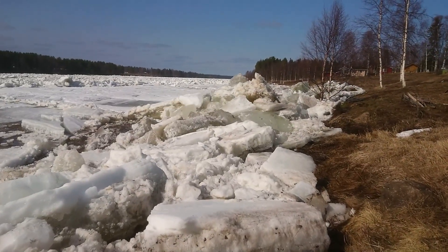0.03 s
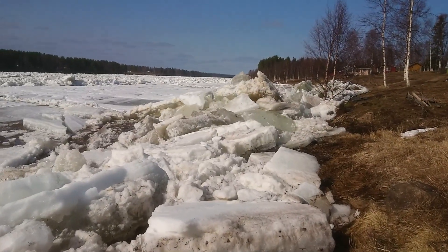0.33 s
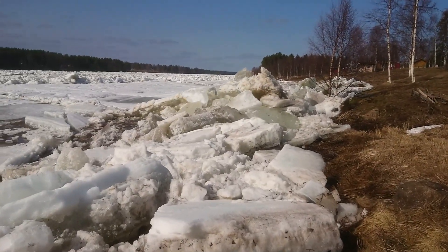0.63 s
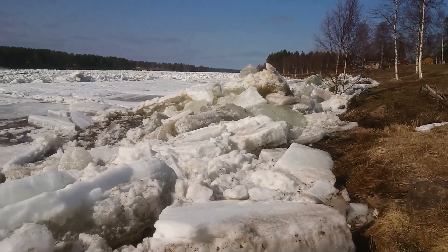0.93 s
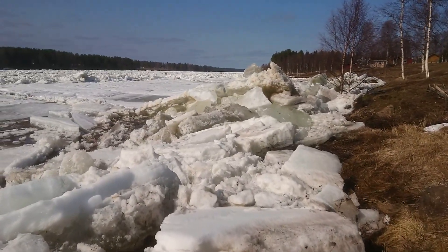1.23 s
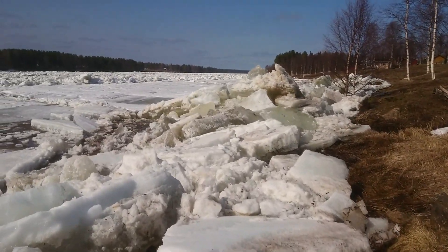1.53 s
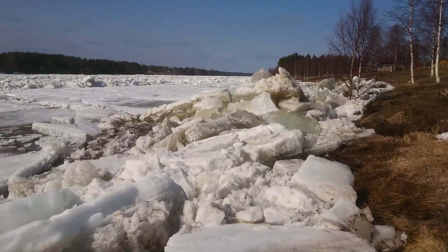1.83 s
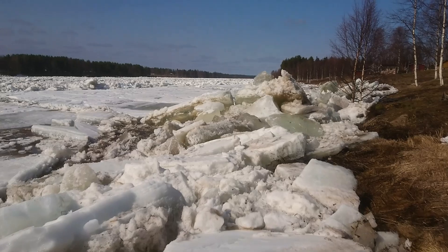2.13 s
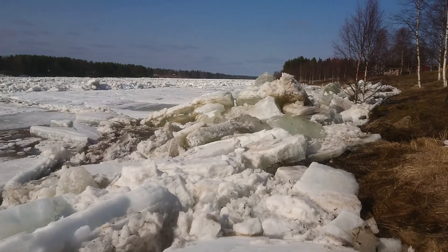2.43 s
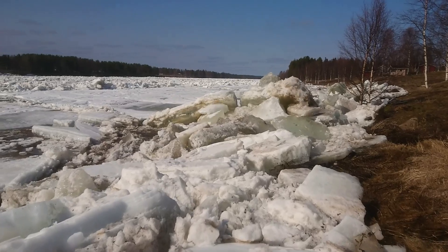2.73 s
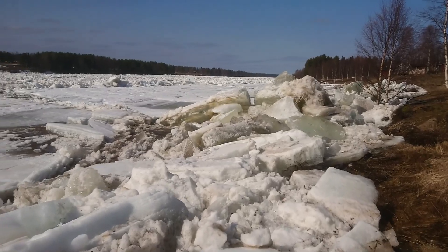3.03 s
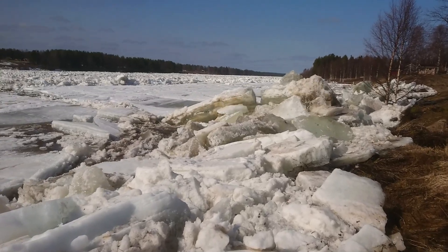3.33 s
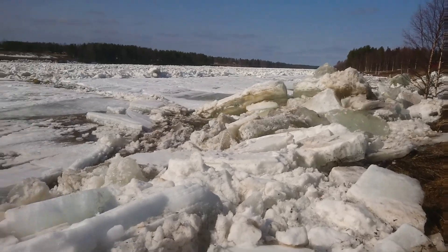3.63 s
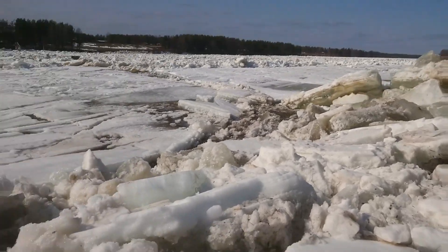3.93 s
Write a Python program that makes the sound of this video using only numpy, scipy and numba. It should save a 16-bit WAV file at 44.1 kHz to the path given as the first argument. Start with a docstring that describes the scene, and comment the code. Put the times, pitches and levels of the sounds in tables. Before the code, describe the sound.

Broken river ice crumbles and clinks over washing water, with wind buffeting the microphone.

```python
"""Wind buffets a two-port microphone, mostly on the right, over washing water and a faint tinkle of ice.
It is spring break-up, the river lying to the left: drifting floes push into a pile of rotten ice,
which crumbles in two surges of countless clinking shards. A narrow hiss swells briefly right, later left.
A few pieces crack, two heavy blocks settle, and the pile grinds as it gives way in the second surge."""
import sys
import numpy as np
from scipy import signal
from scipy.fft import rfft, irfft
from scipy.io import wavfile
from numba import njit

SR = 44100
rng = np.random.default_rng(int(sys.argv[2]) if len(sys.argv) > 2 else 0)


def persist_wave(psi):
    """Save psi, clipped to +-1, as 16-bit WAV."""
    counts = np.round(np.clip(psi, -1, 1) * 32767).astype(np.int16)
    wavfile.write(sys.argv[1], SR, np.atleast_2d(counts).T)


N = 176400
TIMES = np.arange(N) / SR
FREQS = np.maximum(np.arange(N // 2 + 1) * SR / N, 1)
LOW_CUT_HZ, TOP_HZ = 31.5, 15850


def undb(db):
    """Decibels to gain."""
    return 10 ** (np.asarray(db) / 20)


def unit(x):
    """Normalise to rms 1."""
    return x / np.sqrt(np.mean(x ** 2))


def shape(x, gain):
    """Filter by a gain per frequency."""
    return irfft(rfft(x) * gain, N)


def equalise(x, table):
    """EQ from rows of f/Hz and one or more gain/dB columns."""
    hz, *columns = np.array(table, float).T
    return shape(x, undb([np.interp(np.log(FREQS), np.log(hz), db) for db in columns]))


def fader(table):
    """Gain rides from rows of t/s and one or more level/dB columns."""
    s, *columns = np.array(table, float).T
    return undb([np.interp(TIMES, s, db) for db in columns])


def band_rms(x, low_hz, high_hz):
    """Rms of the mono mix within a band."""
    return np.std(shape(x.mean(0), (FREQS > low_hz) & (FREQS < high_hz)))


def drift(rate_hz):
    """Smooth random modulation with rms 1."""
    return unit(shape(rng.standard_normal(N), 1 / (1 + (FREQS / rate_hz) ** 4)))


def swell(s, half_s):
    """A smooth rise and fall around a moment."""
    return np.exp(-.5 * ((TIMES - s) / half_s) ** 2)


def bell(hz, octaves):
    """Gain of a bell-shaped resonance."""
    return np.exp(-.5 * (np.log2(FREQS / hz) / octaves) ** 2)


def panned(db, pan_db):
    """Left and right gains; positive pan leans left."""
    return undb([[db + pan_db / 2], [db - pan_db / 2]])


@njit
def ring(start, hz, decay_s, size, glide):
    """Sum of short dying tones, each rising in pitch by the share `glide` per decay time."""
    out = np.zeros(N)
    for k in range(len(start)):
        first, life = int(start[k] * N), decay_s[k] * SR
        turn = 2 * np.pi * hz[k] / SR
        phasor = size[k] + 0j
        pole = np.exp(1j * turn - 1 / life)
        rise = np.exp(1j * turn * glide / life)
        for i in range(min(int(5 * life), N - first)):
            phasor *= pole
            pole *= rise
            out[first + i] += phasor.imag
    return out


def grains(cycles, spread_db, count, glide=0.0):
    """A dense, spectrally even cloud of ringing grains, a few louder than the rest."""
    when, pitch, length, strength = rng.random((count, 4)).T
    hz = 150 + (TOP_HZ - 150) * pitch ** 1.5
    decay_s = np.minimum(cycles * (.5 + length) / hz, .006)
    accent_db = spread_db * np.minimum(-np.log1p(-strength), 6)
    size = undb(accent_db) * np.sqrt(np.cbrt(pitch) / decay_s)  # evens out the spectrum
    return unit(ring(when, hz, decay_s, size, glide))


def ports(direct, left, right, lag_s=.00052, turn_rad=.72):
    """Direct sound reaches the right port late and turned in phase; scattered sound differs at each."""
    direct_share = .46 / (1 + (FREQS / 7260) ** 2)
    phase = 2 * np.pi * FREQS * lag_s - turn_rad * np.tanh(FREQS / 400)
    right_delay = np.exp(-1j * phase * np.array([[0], [1]]))
    scattered = shape(np.array([left, right]), np.sqrt(1 - direct_share))
    return shape(direct, np.sqrt(direct_share) * right_delay) + scattered


def eddy(s, hz):
    """Pressure of a passing eddy: a dip between two shoulders."""
    u = np.minimum((np.pi * hz * (TIMES - s)) ** 2, 50)
    return (2 * u - 1) * np.exp(-u)


# EQ of the wind rumble: f/Hz, gain/dB
WIND_EQ = [(22,-34),(35,-19),(52,-1),(80,-3.5),(130,-9.5),(220,-17.5),(400,-29),(3000,-83)]
# gusts at the right port: t/s, level/dB
GUSTS = [(0,-34.5),(.62,-36.5),(.73,-34),(1.13,-33),(1.24,-32),(1.55,-39.5),(2.25,-37.5),(2.52,-29.5),(2.85,-34.5),(3.1,-25.5),(3.38,-30.5),(3.5,-28),(3.62,-38.5),(4,-33.5)]
# eddies popping on the right port: t/s, f/Hz, level/dB
EDDY_POPS = [(.221,135,-20.5),(.684,143,-15.5),(0.704,161,-19),(0.735,75,-18.5),(1.215,131,-20.5),(1.239,95,-22),(2.61,118,-15.5),(2.705,82,-18.5),(2.943,91,-13.5),(3.026,165,-7.5),(3.049,120,-15.5),(3.064,90,-14),(3.144,73,-13.5),(3.175,82,-12.5),(3.234,80,-16),(3.326,150,-15),(3.465,95,-15.5),(3.512,105,-15.5)]


def wind(left_db=-46.5, bleed_db=-13, core_db=-12.5):
    """Turbulence rumbles mainly at the right port, where single eddies strike as well."""
    rumble = unit(equalise(rng.standard_normal((2, N)), WIND_EQ))
    rumble *= undb(.5 * drift(rate_hz=25))
    right = rumble[1] * fader(GUSTS)[0]
    left = rumble[0] * undb(left_db) + right * undb(bleed_db)
    for s, hz, db in EDDY_POPS:
        sharp_core = undb(core_db) * eddy(s, 2 * hz)
        right += undb(db) * (eddy(s, hz) + sharp_core)
    return np.array([left, right])


# EQ of the water bed: f/Hz, left gain/dB, right gain/dB
WATER_EQ = [(148,-26,-4),(415,-6,-6),(675,-4.5,3),(940,-9,-5),(1210,-7.5,1.5),(1390,-13,-3.5),(5000,-3,-0.5),(5150,-17,0.5),(6030,-10,-7),(7040,-11.5,-7),(9100,-14.5,-17),(14000,-13.5,-6.5)]


def water(level_db=-42):
    """The current washes between the floes: a steady bed of small bubbles."""
    bubbles = [grains(cycles=3.3, spread_db=1.34, count=30000, glide=.016) for _ in range(3)]
    wash = equalise(ports(*bubbles), WATER_EQ)
    return unit(wash) * undb(level_db + .5 * drift(rate_hz=3.2))


def shimmer(x, bands=24, depth_db=.64, rate_hz=10.7):
    """The colour of the clinking shifts: each band waxes and wanes on its own."""
    centres = np.geomspace(1000, TOP_HZ, bands)
    return sum(shape(x, np.interp(FREQS, centres, band)) * undb(depth_db * drift(rate_hz))
               for band in np.eye(bands))


# EQ of the clinking ice: f/Hz, left gain/dB, right gain/dB
ICE_EQ = [(160,-5,1),(417,-16,-10),(885,-18,-13),(1460,-17.5,-4),(1930,-12,-1.5),(2560,-10.5,1),(3260,-3.5,-0.5),(4120,-3.5,-7.5),(5160,-5,-1),(6100,-8,-9),(6570,-5.5,-11.5),(8900,-5.5,-5.5),(9250,-5.5,-13),(9800,-3,-5.5),(11800,-1,-17.5),(12900,-1.5,-11),(14000,-1,-11),(15400,-3,-8)]
# fader rides of the two surges: t/s, crunch level/dB, shard level/dB
SURGES = [(0,-45.5,-50),(.25,-51,-55),(.9,-50.5,-52),(1.25,-46,-47.5),(1.6,-40.5,-38),(1.73,-33.5,-33),(1.92,-39,-36),(2.2,-40.5,-36.5),(2.35,-36.5,-37),(2.5,-40,-35.5),(2.76,-43,-40.5),(3.12,-38.5,-37.5),(3.29,-35,-32),(3.58,-30.5,-30),(3.92,-35.5,-32),(4,-37.5,-28)]
# small slides of ice: t/s, half length/s, crunch boost/dB, shard boost/dB
ICE_SLIDES = [(1.508,0.015,2.5,5.5),(1.705,0.025,2.5,0.5),(1.92,.025,1.5,0.5),(2.132,0.0027,3,7),(2.452,0.015,2.5,4.5),(3.317,0.017,4.5,4)]


def crumbling(crossover_hz=3300, tremor_db=.66, trim_db=.5):
    """Ice crystals break off and clink together; coarse crunch and fine shards swell in small slides."""
    clinks = [grains(cycles=17, spread_db=.95, count=60000) for _ in range(3)]
    ice = shimmer(equalise(ports(*clinks), ICE_EQ))
    lows = shape(ice, 1 / (1 + (FREQS / crossover_hz) ** 4))
    crunch = lows / band_rms(ice, 1200, 3500)
    shards = (ice - lows) / band_rms(ice, 8000, 16000)
    slides_db = sum(np.outer(boosts, swell(s, half_s)) for s, half_s, *boosts in ICE_SLIDES)
    ride_db = trim_db + slides_db + tremor_db * drift(rate_hz=6.6)
    crunch_gain, shard_gain = fader(SURGES) * undb(ride_db)
    flutter = undb(.5 * drift(rate_hz=34))
    return crunch * crunch_gain * flutter + shards * shard_gain


# swells of narrow hiss: t/s, half length/s, f/Hz, width/octaves, level/dB, pan left/dB
HISS_SWELLS = [(.97,0.2,5050,0.22,-50.5,-16.5),(2.47,0.085,12000,.06,-43,16)]


def hiss(grit):
    """A narrow hiss near 5 kHz swells briefly at the right port, later one near 12 kHz at the left."""
    return sum(unit(shape(grit, bell(hz, octaves))) * panned(db, pan_db) * swell(s, half_s)
               for s, half_s, hz, octaves, db, pan_db in HISS_SWELLS)


# snaps in the ice: t/s, level/dB, f/Hz, decay/s, pan left/dB
SNAPS = [(1.438,-33.5,2950,0.008,-9),(1.925,-33.5,1810,.016,-8),(2.086,-28,2980,.0045,-12),(2.092,-25,1260,0.0026,-10.5),(2.128,-17.5,3350,.0044,-2.5),(2.354,-35,650,0.014,-9),(3.585,-24,2660,0.025,-9),(3.611,-28.5,1800,0.031,-14.5),(3.973,-24.5,2770,.03,-8)]


def cracks(ring_db=7, attack_s=.0011):
    """A piece snaps: a short rasp of fractures around the pitch at which it rings."""
    out = np.zeros((2, N))
    for s, db, hz, decay_s, pan_db in SNAPS:
        age = np.maximum(TIMES - s, 0)
        envelope = (1 - np.exp(-age / attack_s)) * np.exp(-age / decay_s)
        body = bell(hz, octaves=1.14) + undb(ring_db) * bell(hz, octaves=.12)
        rasp = unit(shape(rng.standard_normal((3, N)), body)) * envelope
        out += ports(*rasp) * panned(db, pan_db)
    return out


# heavy blocks settling: t/s, f/Hz, level before the port gains/dB
BLOCK_THUDS = [(2.378,80,-22),(2.465,69,-20.5)]


def thuds(fade_s=.011, left_db=-.48, right_db=6.02):
    """A block settles with a low bump that swells and dies equally fast, louder on the right."""
    bumps = np.zeros(N)
    for s, hz, db in BLOCK_THUDS:
        envelope = np.exp(-np.abs(TIMES - s) / fade_s)
        bumps += undb(db) * envelope * np.sin(2 * np.pi * hz * (s - TIMES))
    return bumps * undb([[left_db], [right_db]])


def grinding(grit, left_db=-48, right_db=-37):
    """Floes rub with a low grinding as the pile gives way."""
    grind = unit(shape(grit, bell(hz=848, octaves=.6))) * swell(s=3.6, half_s=.4)
    return grind * undb([[left_db], [right_db]])


def scene():
    """The stereo mix of ice, water and wind."""
    ice = crumbling()
    grit = grains(cycles=5.8, spread_db=6, count=20000)
    return ice + hiss(grit) + grinding(grit) + water() + cracks() + thuds() + wind()


def record(dry):
    """A low cut drops the deepest rumble and a steep low-pass trims the top."""
    low_cut = shape(dry, 1 / (1 + (LOW_CUT_HZ / FREQS) ** 8))
    return signal.sosfilt(signal.ellip(12, .2, 80, TOP_HZ, fs=SR, output="sos"), low_cut)


dry = scene()
out = record(dry)
persist_wave(out)
```